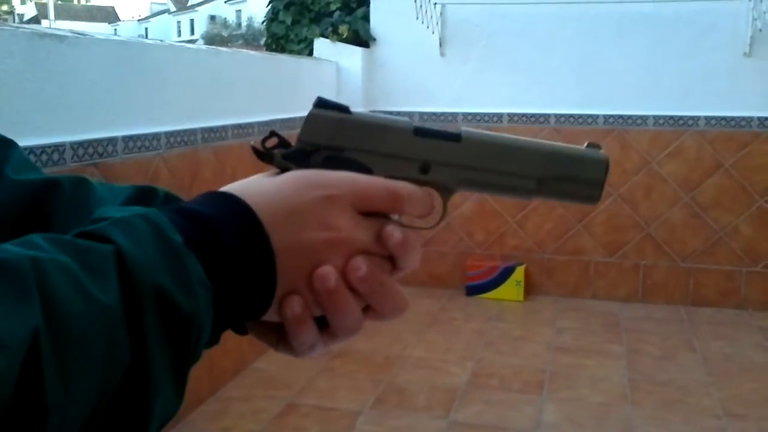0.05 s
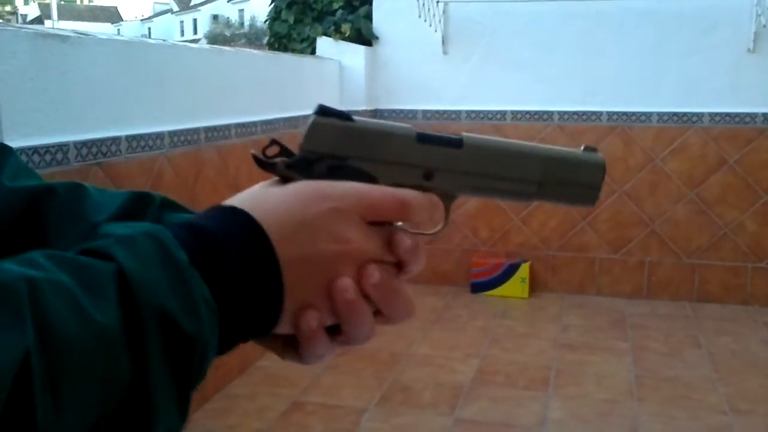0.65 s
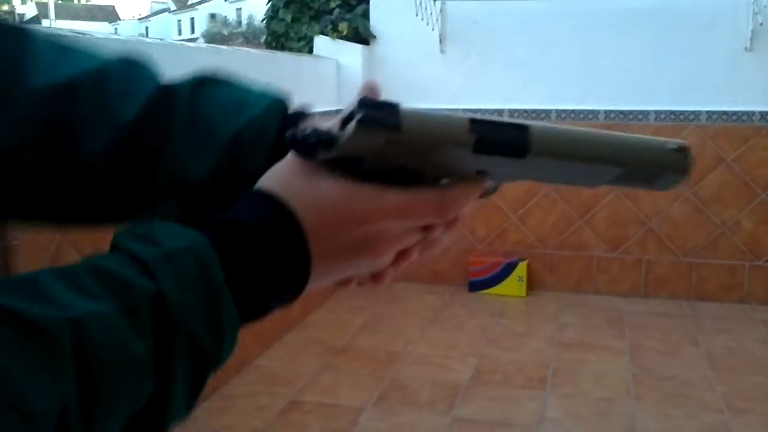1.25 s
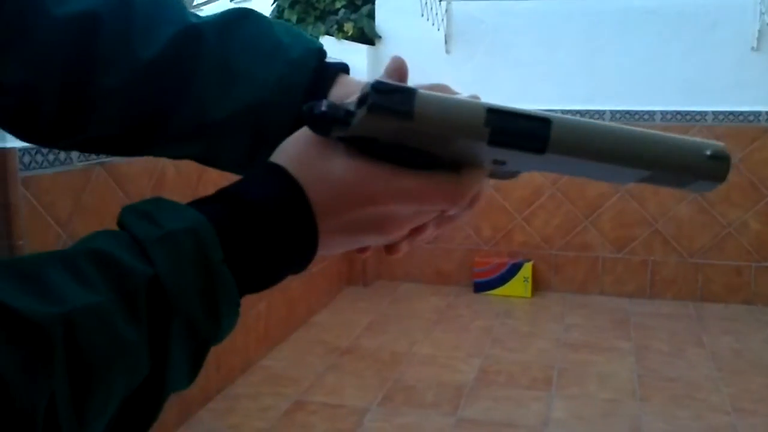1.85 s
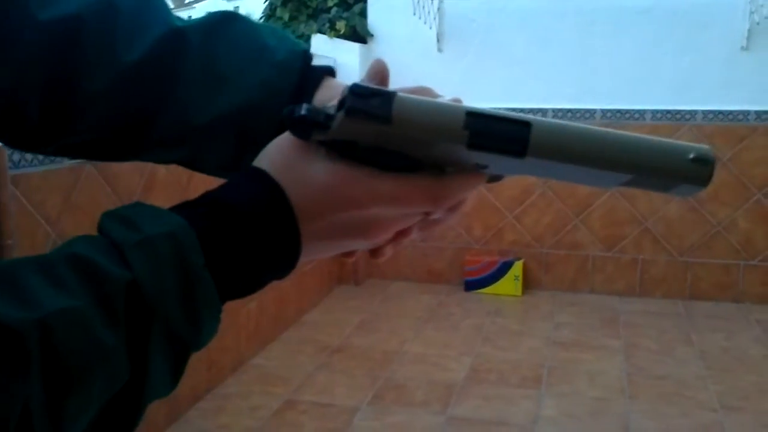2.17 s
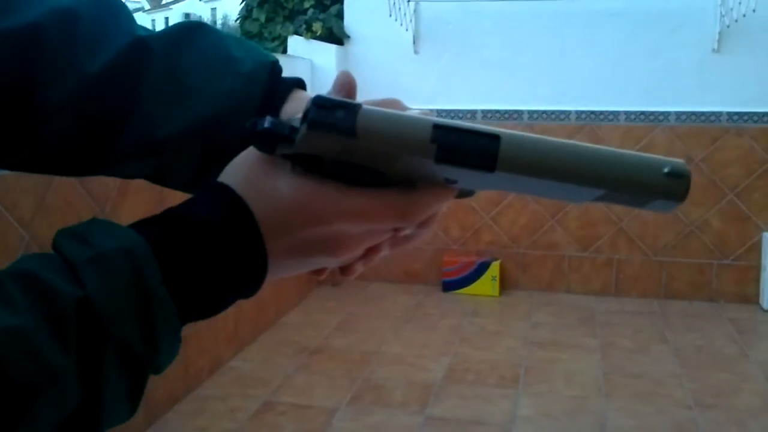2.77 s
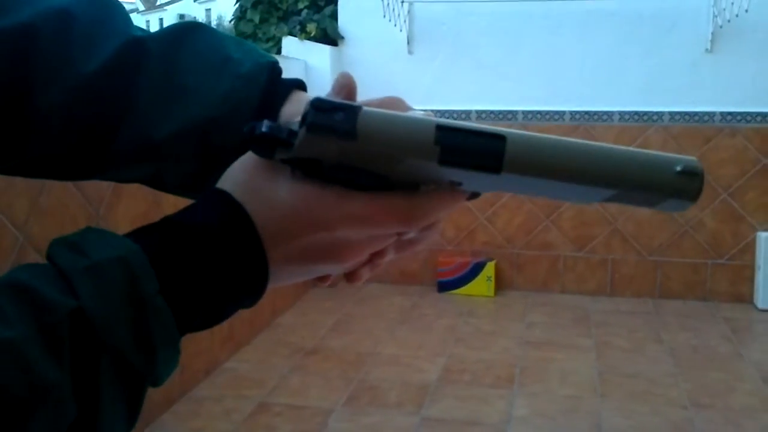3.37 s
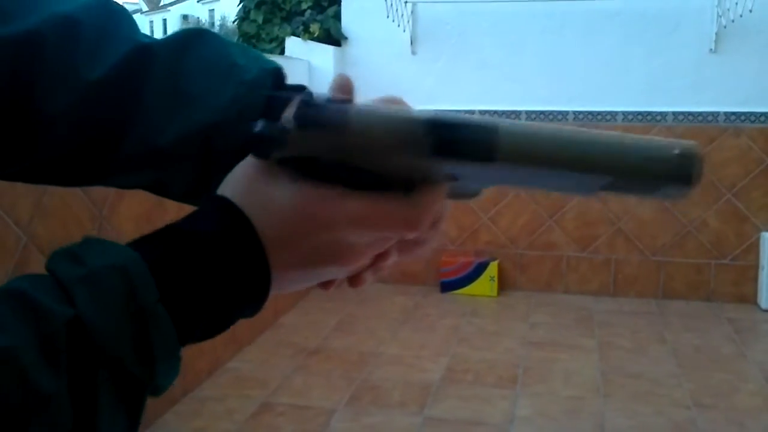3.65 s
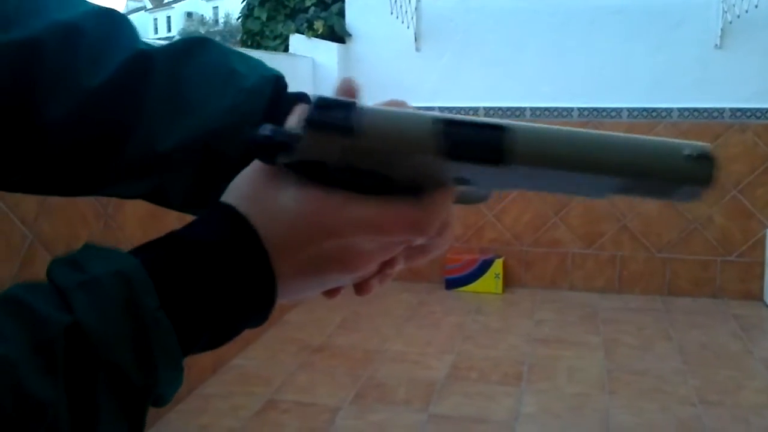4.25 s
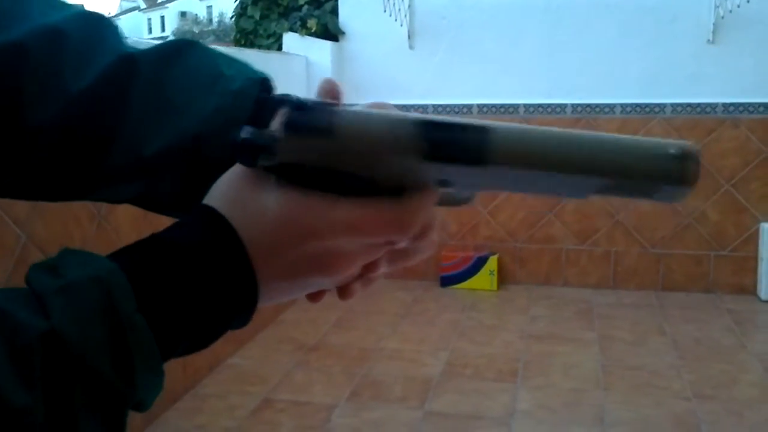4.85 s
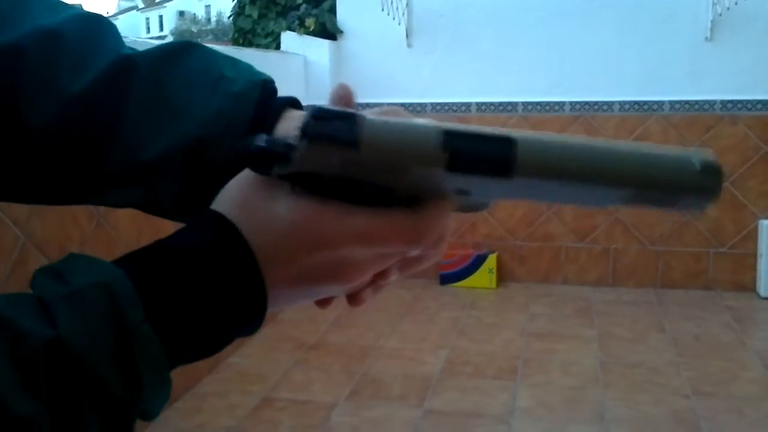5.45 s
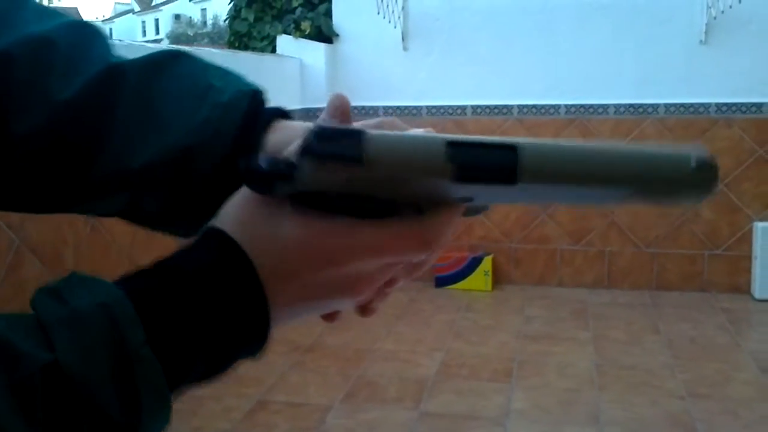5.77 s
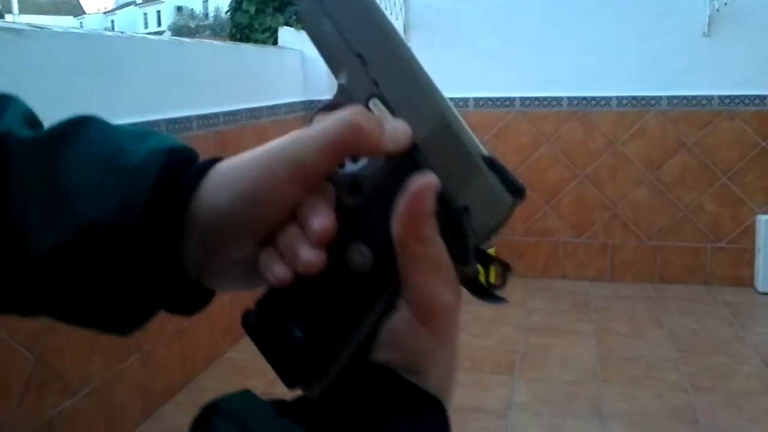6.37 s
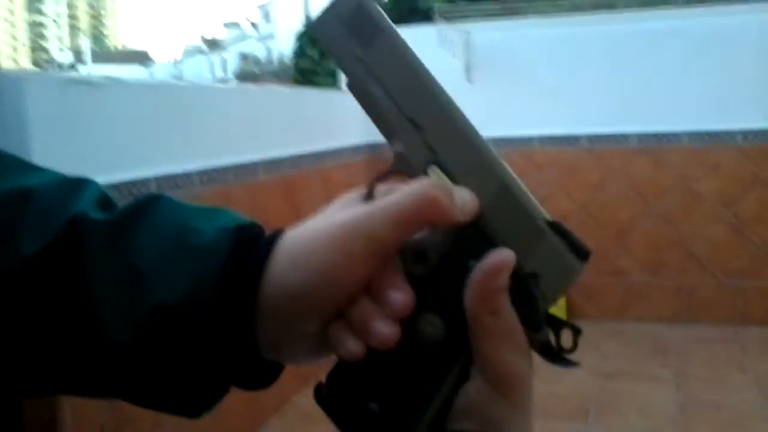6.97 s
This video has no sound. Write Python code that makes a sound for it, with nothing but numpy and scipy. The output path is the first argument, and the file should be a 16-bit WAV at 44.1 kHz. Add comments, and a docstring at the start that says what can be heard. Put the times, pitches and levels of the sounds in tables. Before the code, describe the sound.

Close airsoft pistol shots pop and clack at a steady pace outdoors, with pellets ticking off tiles and faint sleeve rustle.

```python
"""A gas blowback airsoft pistol fires nine close, snappy shots in a small tiled patio.
Each shot takes under a tenth of a second: the hammer falls, the valve spits, gas pops from the muzzle,
the slide hits its rear stop, picks up a pellet and slams shut. The walls ring briefly and pellets tick
off the tiles. Between shots the grip clicks and sleeves rustle, over a low rumble and an outdoor hush."""
import sys
import numpy as np
from scipy import signal
from scipy.fft import rfft, irfft
from scipy.io import wavfile
from scipy.ndimage import uniform_filter1d, map_coordinates

SR = 44100
rng = np.random.default_rng(int(sys.argv[2]) if len(sys.argv) > 2 else 0)


def materialize(psi):
    """Save the field psi as 16-bit PCM at rate SR to the path in sys.argv[1].

    A 1-D psi becomes a single channel; in a 2-D psi each row is a channel.
    """
    bounded = np.clip(np.atleast_2d(psi).T, -1, 1)
    quanta = np.round(bounded * 32767).astype(np.int16)
    wavfile.write(sys.argv[1], SR, quanta)


N = 309582

# Levels in the tables are relative: each layer adds its own trim.
# fader ride of the low rumble: time_s, level_db
RUMBLE_RIDE = [(0.0, -65), (0.08, -56), (1.64, -39.5), (2.05, -59.5), (2.09, -51), (3.42, -53),
               (3.52, -33.5), (3.6, -55), (4.05, -39), (4.22, -51), (4.69, -39.5), (5.02, -64.5),
               (5.85, -37), (5.91, -59), (5.98, -36), (6.18, -43.5), (6.69, -41), (7.02, -58)]
# tone of the rumble and of the distant hush: freq_hz, level_db
RUMBLE_EQ = [(20, -25), (36, -6), (48, 2.5), (56, -2), (72, -11.5), (110, -17), (160, -21.5), (230, -30),
             (400, -66.5), (2000, -105)]
HUSH_EQ = [(30, 8), (100, 3.5), (200, 1), (400, 1), (800, -9), (1400, -13), (2100, -7), (2500, -21),
           (3000, -20), (5000, -25.5), (10000, -29), (16000, -34)]
# cue sheet; the slide cycles more slowly as the gas cools, and partly recovers in the pause:
# hammer_s, shut_s, trigger_db, hammer_bright_db, kick_db, valve_db, muzzle_db, rear_stop_db, slam_db
SHOT_CUES = [(0.3372, 0.4040, -38, 2.5, -3, -4, -1.5, -3, 0.5),
             (1.6624, 1.7292, -29.5, 2, 2, 2, -1.5, 3, 0.5), (2.2626, 2.3328, -38, 3, -7.5, 1, -2, 3, 1),
             (2.8846, 2.9591, -31, 1, -3, 1.5, -2, 2, 1), (3.5084, 3.5846, -34, -3, 1.5, 4.5, -2, 1, -2),
             (4.0862, 4.1657, -31, 4.5, 1, 4.5, -5.5, -8, -1.5),
             (4.6932, 4.7785, -36.5, -2.5, 3.5, 4, -1.5, -3.5, 1),
             (5.2545, 5.3410, -28.5, 4, -8, 2.5, -3, -11, 0.5),
             (6.6367, 6.7180, -40.5, -0.5, -2.5, -1, 1.5, 4.5, 1.5)]
# tone of the slide and small clicks, the hammer, the valve and the muzzle: freq_hz, level_db
CLACK_EQ = [(100, -21.5), (400, -20.5), (800, -12), (1400, -2), (2100, 2.5), (2700, 0), (3800, -10.5),
            (5000, -8.5), (6300, -8), (8000, -15), (10000, -24), (15000, -29)]
HAMMER_EQ = [(100, -19), (200, -6), (500, -7), (1200, -5), (2100, 5), (3000, -1.5), (3900, -15.5),
             (5500, -13), (7500, -15), (10000, -28), (15000, -32.5)]
VALVE_EQ = [(100, -17.5), (400, -9.5), (1200, -6), (2200, 0), (3700, -9), (5800, 3), (7500, -5.5),
            (10000, -16), (15000, -21.5)]
MUZZLE_EQ = [(100, -11), (200, -2.5), (310, 1.5), (410, 3.5), (520, -2), (620, -8), (900, 3.5),
             (1400, -0.5), (2000, 0), (3000, -7.5), (4000, -16), (5500, -15), (10000, -24), (15000, -29.5)]
# metallic ring of slide and frame, its decay capped at longest_t60_s: pitch_hz, level_db, t60_s
METAL_MODES = [(1320, 2.5, 0.39), (2020, -0.5, 0.14), (1920, -4, 0.13), (2020, -1, 0.22), (2200, -2, 0.19),
               (2300, -4, 0.19), (2620, -8.5, 0.1), (3128, -14.5, 0.13), (4680, -10.5, 0.12),
               (5750, -8, .13), (6160, -7, 0.11), (7100, -10.5, 0.08), (11400, -21.5, 0.12),
               (12300, -21.5, 0.12), (12680, -20, 0.11), (14400, -19, 0.066)]
# boom of the air between the patio walls: pitch_hz, level_db, t60_s
AIR_MODES = [(113, -4, 0.066), (146.8, -2, .13), (181, 1.5, 0.13), (254, 2.5, 0.36), (292, -3.5, .14),
             (374, -4, 0.13), (422, -1.5, 0.44), (726, -3, 0.2), (813, -1.5, 0.16), (940, -1, 0.18),
             (1027, -4, 0.38)]
# early reflections off floor and walls: delay_s, level_db
REFLECTIONS = [(.0023, -13.5), (.0062, -13.5), (.0088, -12), (0.0134, -13.5), (0.0249, -21)]
# length of the reverb tail: freq_hz, t60_s
REVERB_DECAY = [(100, 0.09), (300, 0.2), (900, 0.35), (2100, 0.22), (4000, 0.21), (5500, 0.2726),
                (8000, 0.13), (11000, 0.16), (15000, 0.09)]
# tone of the reverb tail: freq_hz, level_db
REVERB_EQ = [(100, -0.5), (400, -6.5), (1000, -18.5), (2100, -9.5), (4000, -16.5), (8000, -18),
             (14000, -8.5)]
# pellets bouncing off the tiles: start_s, level_db, bright_db
PELLET_CUES = [(0.51, -16.5, -9), (1.8187, -28.5, 6), (2.4034, -18, -2), (3.681, -29, 7.5),
               (4.2563, -25.5, 2.5), (4.8482, -27, 6), (6.7879, -32, 11)]
# two arm moves, one to turn the pistol and one to raise it: time_s, level_db
SLEEVE_RIDE = [(0, -80), (.8, -73), (1.08, -51.5), (1.25, -51.5), (1.45, -54), (1.9, -72), (5.55, -66.5),
               (5.96, -55.5), (6.55, -54.5), (7.02, -73.5)]
# tone of the rubbing cloth: freq_hz, level_db
SLEEVE_EQ = [(150, -33.5), (250, 2.5), (400, -2), (600, -8), (900, -1.5), (1150, -4.5), (2020, 2.5),
             (2730, -16), (3300, -14.5), (5180, -20.5), (9040, -27), (14000, -34.5)]
# fingers shifting on the grip: start_s, level_db, bright_db
GRIP_CUES = [(1.5384, -37.5, 5.5), (2.7735, -42.5, -2.5), (4.4285, -32, -16), (5.916, -31.5, -21),
             (6.29, -33, -34), (6.5168, -37.5, 0)]
# slide and spring pinging after four hard rear stops: start_s, level_db, pitch_hz
PING_CUES = [(2.292, -19.5, 1878), (2.9185, -14, 1890), (3.5402, -13, 2650), (6.6735, -18, 2220)]


def from_db(db):
    """Decibels to gain."""
    return 10 ** (np.asarray(db) / 20)


def rms_one(x):
    """Scale to an rms of 1."""
    return x / np.sqrt(np.mean(x ** 2) + 1e-20)


def ride(rows):
    """A fader curve through (time_s, level_db) rows, at every sample."""
    return np.interp(np.arange(N) / SR, *np.transpose(rows))


def at_hz(points, hz):
    """Read (freq_hz, value) rows on a log-frequency axis."""
    freq_hz, value = np.transpose(points)
    return np.interp(np.log(np.maximum(hz, 1)), np.log(freq_hz), value)


def drift(hz):
    """Smooth random wander with an rms of 1."""
    steps = rng.standard_normal(2000)
    return rms_one(map_coordinates(steps, [np.arange(N) / SR * hz], order=3, mode="wrap"))


def equalise(x, eq):
    """Minimum-phase EQ, so attacks get no pre-ring; white noise keeps its power."""
    size = 16384
    gain = rms_one(from_db(at_hz(eq, np.linspace(0, SR / 2, size // 2 + 1))))
    cepstrum = irfft(np.log(gain))
    cepstrum[1:size // 2] *= 2
    cepstrum[size // 2 + 1:] = 0
    response = irfft(np.exp(rfft(cepstrum)))
    return signal.oaconvolve(x, response)[:len(x)]


def lowpass(x, hz):
    """Second-order low-pass."""
    return signal.sosfilt(signal.butter(2, hz, fs=SR, output="sos"), x + 1e-18)


def ring(strikes, hz, t60_s):
    """A resonator: a unit click sets off a dying sine of height 1."""
    radius, angle = from_db(-60 / (t60_s * SR)), 2 * np.pi * hz / SR
    feedback = [1, -2 * radius * np.cos(angle), radius ** 2]
    return signal.lfilter([0, np.sin(angle)], feedback, strikes + 1e-18)


def add(track, start_s, sound):
    """Drop a sound onto a track."""
    start = round(start_s * SR)
    track[start:start + len(sound)] += sound[:N - start]


def cues(start_s, level_db, bright_db):
    """Cue rows from columns or shared values."""
    return np.column_stack(np.broadcast_arrays(start_s, level_db, bright_db))


def clicks(events, spread_db):
    """One click per cue, each a little different in strength."""
    track = np.zeros(N)
    for start_s, level_db, _ in events:
        track[round(start_s * SR)] = from_db(level_db + spread_db * rng.standard_normal())
    return track


def bursts(events, eq, trim_db, rise_s, decay_s):
    """One short noise burst of chatter or gas per cue; bright_db sets its treble shelf."""
    t, track = np.arange(SR // 12) / SR, np.zeros(N)
    hz = np.fft.rfftfreq(len(t), 1 / SR)
    envelope = (1 - np.exp(-t / rise_s)) * np.exp(-t / decay_s)
    for start_s, level_db, bright_db in events:
        white = rng.choice([-1., 1.], len(t))
        shelf = from_db(at_hz([(2500, 0), (4500, bright_db)], hz))
        noise = irfft(rfft(white) * shelf, len(t))
        add(track, start_s, from_db(level_db + trim_db) * envelope * noise)
    return equalise(track, eq)


def outdoor_bed(rumble_db, swell_db, swell_hz, hush_db, waver_db):
    """A deep rumble swells and fades at random under a dull, wavering outdoor hush."""
    rumble = equalise(rng.standard_normal(N + SR), RUMBLE_EQ)[SR:]
    rumble /= np.sqrt(uniform_filter1d(rumble ** 2, size=3000) + 1e-12)   # even it out before the fader
    hush = equalise(rng.standard_normal(N), HUSH_EQ)
    rumble *= from_db(ride(RUMBLE_RIDE) + rumble_db + swell_db * np.tanh(drift(swell_hz)))
    hush *= from_db(hush_db + waver_db * drift(hz=6.0))
    return rumble + hush


def firing_cycle(trigger_lead_s, swing_s, valve_lag_s, muzzle_lag_s, stop_share, feed_share):
    """Cue each part around the hammer's fall; rear stop and feed land at shares of the cycle."""
    (hammer_s, shut_s, trigger_db, hammer_bright_db,
     kick_db, valve_db, muzzle_db, rear_stop_db, slam_db) = np.transpose(SHOT_CUES)
    cycle_s = shut_s - hammer_s
    return dict(trigger=cues(hammer_s - trigger_lead_s, trigger_db, bright_db=1.5),
                sear=cues(hammer_s - swing_s, level_db=-17.5, bright_db=1.5),
                hammer=cues(hammer_s, level_db=-1.44, bright_db=hammer_bright_db),
                kick=cues(hammer_s, kick_db, bright_db=0),
                valve=cues(hammer_s + valve_lag_s, valve_db, bright_db=-3.5),
                muzzle=cues(hammer_s + muzzle_lag_s, muzzle_db - 5.0, bright_db=2.04),
                rear_stop=cues(hammer_s + stop_share * cycle_s, rear_stop_db, bright_db=-1.0),
                feed=cues(hammer_s + feed_share * cycle_s, level_db=-4.0, bright_db=-0.5),
                slam=cues(shut_s, slam_db, bright_db=2.5))


def trigger_clicks(action):
    """The trigger breaks with a tiny click just ahead of each shot."""
    return bursts(action["trigger"], CLACK_EQ, trim_db=-8.0, rise_s=0.00038, decay_s=0.002)


def hammer_and_slide(action, ring_db, longest_t60_s):
    """The sear snaps, then hammer and slide crack against the frame with a short metallic ring."""
    snap = bursts(action["sear"], CLACK_EQ, trim_db=-3.5, rise_s=0.0008, decay_s=0.0027)
    cracks = (bursts(action["hammer"], HAMMER_EQ, trim_db=0.5, rise_s=0.0015, decay_s=0.0043)
              + bursts(action["rear_stop"], CLACK_EQ, trim_db=-5.5, rise_s=0.0007, decay_s=0.0059)
              + bursts(action["feed"], CLACK_EQ, trim_db=-10.0, rise_s=0.00056, decay_s=0.0043)
              + bursts(action["slam"], CLACK_EQ, trim_db=-1.5, rise_s=0.0003, decay_s=0.003))
    blows = [*action["hammer"], *action["rear_stop"], *action["feed"], *action["slam"]]
    ringing = sum(from_db(db) * ring(clicks(blows, spread_db=3.0), hz, min(t60_s, longest_t60_s))
                  for hz, db, t60_s in METAL_MODES)
    return snap + cracks + from_db(ring_db) * ringing


def gas_blast(action, kick_db, kick_hz, pop_db, pop_hz, boom_db):
    """The valve spits; a low kick thumps the frame as the hammer falls; the muzzle's pressure pulse pops and
    rings the patio's air."""
    spit = bursts(action["valve"], VALVE_EQ, trim_db=-5.5, rise_s=0.0007, decay_s=0.0046)
    jet = bursts(action["muzzle"], MUZZLE_EQ, trim_db=-1.0, rise_s=0.00016, decay_s=0.012)
    kick = from_db(kick_db) * ring(clicks(action["kick"], spread_db=0.53), kick_hz, t60_s=0.028)
    pulses = clicks(action["muzzle"], spread_db=1.5)
    pop = -from_db(pop_db) * ring(pulses, pop_hz, t60_s=0.007)
    boom = sum((-1) ** k * from_db(db) * ring(pulses, hz, t60_s)   # modes alternate in polarity
               for k, (hz, db, t60_s) in enumerate(AIR_MODES))
    return spit + jet + kick + pop + from_db(boom_db) * boom


def patio_reverb(x, echo_cutoff_hz, build_s):
    """The direct sound, a quick slap off floor and walls, then a tail that lasts longest in the mids."""
    t = np.arange(int(0.6 * SR)) / SR
    early = np.zeros(len(t))
    for delay_s, level_db in REFLECTIONS:
        early[round(delay_s * SR)] += from_db(level_db)
    response = lowpass(early, echo_cutoff_hz)
    white, hz = rfft(rng.standard_normal(len(t))), np.fft.rfftfreq(len(t), 1 / SR)
    edges_hz = np.geomspace(60, 18000, 22)
    bloom = 1 - np.exp(-(t / build_s) ** 2)
    for low, high in zip(edges_hz, edges_hz[1:]):
        centre_hz = np.sqrt(low * high)
        envelope = bloom * from_db(-60 * t / at_hz(REVERB_DECAY, centre_hz))
        band = irfft(white * ((hz >= low) & (hz < high)), len(t))
        response += from_db(at_hz(REVERB_EQ, centre_hz)) * band * envelope / np.linalg.norm(envelope)
    return x + signal.oaconvolve(x, response)[:N]


def in_patio(pistol):
    """Each shot rings off the patio walls with its own slightly different diffuse tail."""
    splits_s = [shot[0] - 0.1 for shot in SHOT_CUES[1:]]
    shot_index = np.searchsorted(splits_s, np.arange(N) / SR)
    return sum(patio_reverb(pistol * (shot_index == k), echo_cutoff_hz=6400, build_s=0.022)
               for k in range(len(SHOT_CUES)))


def pellet_bounces():
    """Pellets hit the tiles with a sharp tick."""
    return bursts(PELLET_CUES, CLACK_EQ, trim_db=-6.5, rise_s=0.0001, decay_s=0.0022)


def sleeve_rustle(grain_db, swell_db, swell_hz, brisk_db, brighten):
    """Cloth fibres catch and slip in a fine grain; each band swells alone, and brisk moves brighten."""
    level_db = ride(SLEEVE_RIDE)
    grain = from_db(grain_db * rms_one(lowpass(rng.standard_normal(N), hz=120)))
    rub_spectrum = rfft(rms_one(equalise(grain * rng.standard_normal(N), SLEEVE_EQ)))
    band = np.digitize(np.fft.rfftfreq(N, 1 / SR), [400, 800, 1250, 1700, 2200])
    tilt_db = brighten * np.maximum(level_db - brisk_db, 0)
    rustle = np.zeros(N)
    for k in np.unique(band):
        band_db = swell_db * drift(swell_hz) + tilt_db * (k / band.max() - 0.5)
        rustle += from_db(band_db) * irfft(rub_spectrum * (band == k), N)
    return from_db(level_db) * rustle


def grip_handling(knock_db, knock_hz):
    """The grip clicks and gives a hollow knock under the fingers."""
    ticks = bursts(GRIP_CUES, CLACK_EQ, trim_db=-8.0, rise_s=0.00038, decay_s=0.002)
    knocks = ring(clicks(GRIP_CUES, spread_db=1.5), knock_hz, t60_s=0.013)
    return ticks + from_db(knock_db) * knocks


def spring_pings(t60_s):
    """A hard rear stop leaves one short metallic note in the slide and its spring."""
    t, track = np.arange(SR // 4) / SR, np.zeros(N)
    for start_s, level_db, pitch_hz in PING_CUES:
        add(track, start_s, from_db(level_db - 60 * t / t60_s) * np.sin(2 * np.pi * pitch_hz * t))
    return track


def hiss_suppressor(x, split_hz, open_db, slope, floor_db):
    """A treble expander: faint highs are turned down, which tightens bright tails."""
    treble = signal.sosfiltfilt(signal.butter(4, split_hz, "high", fs=SR, output="sos"), x)
    level_db = 10 * np.log10(np.abs(uniform_filter1d(treble ** 2, size=400)) + 1e-14)
    gain = from_db(np.clip(slope * (level_db - open_db), floor_db, 0))
    return x + treble * (gain - 1)


def scene():
    """The mono mix: pistol and pellets through the patio reverb, sleeves and outdoor bed dry."""
    action = firing_cycle(trigger_lead_s=0.025, swing_s=0.0036, valve_lag_s=0.0072, muzzle_lag_s=0.0158,
                          stop_share=0.435, feed_share=0.755)
    metal = hammer_and_slide(action, ring_db=-40.0, longest_t60_s=0.21) + spring_pings(t60_s=0.085)
    blast = gas_blast(action, kick_db=-9.5, kick_hz=208, pop_db=-2.5, pop_hz=395, boom_db=-24.5)
    ticks = trigger_clicks(action) + grip_handling(knock_db=-8.5, knock_hz=1440) + pellet_bounces()
    cloth = sleeve_rustle(grain_db=1.0, swell_db=1.55, swell_hz=8.6, brisk_db=-55.0, brighten=1.66)
    bed = outdoor_bed(rumble_db=-1.5, swell_db=7.0, swell_hz=17.0, hush_db=-62, waver_db=3.2)
    return (in_patio(metal + blast + ticks) + cloth + bed)[None]


def record(dry):
    """Master chain: suppress faint hiss, soft-clip the peaks, cut the very top."""
    cleaned = hiss_suppressor(dry, split_hz=2600, open_db=-48.5, slope=0.38, floor_db=-7.5)
    high_cut = signal.cheby2(16, 60, 16600, fs=SR, output="sos")   # 60 dB down from 16.6 kHz
    return signal.sosfilt(high_cut, np.tanh(cleaned))


dry = scene()
out = record(dry)
materialize(out)
```